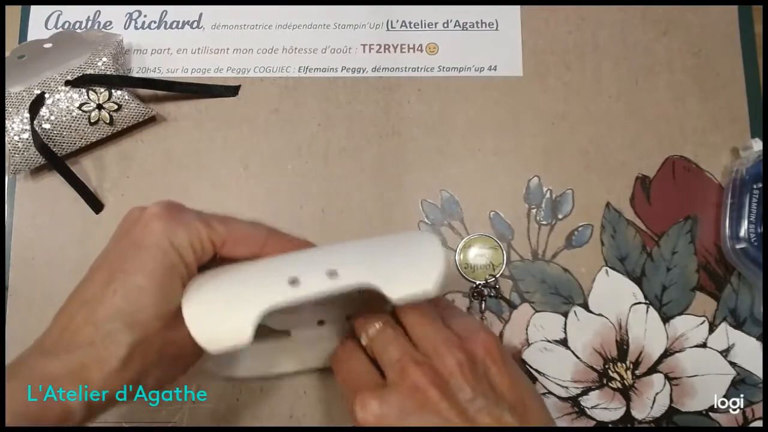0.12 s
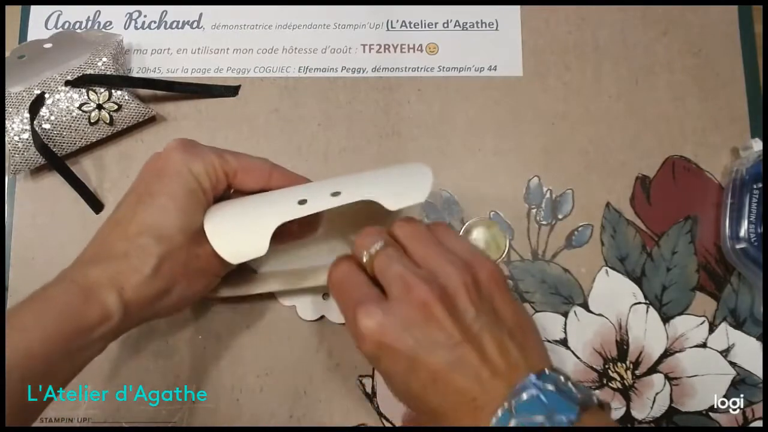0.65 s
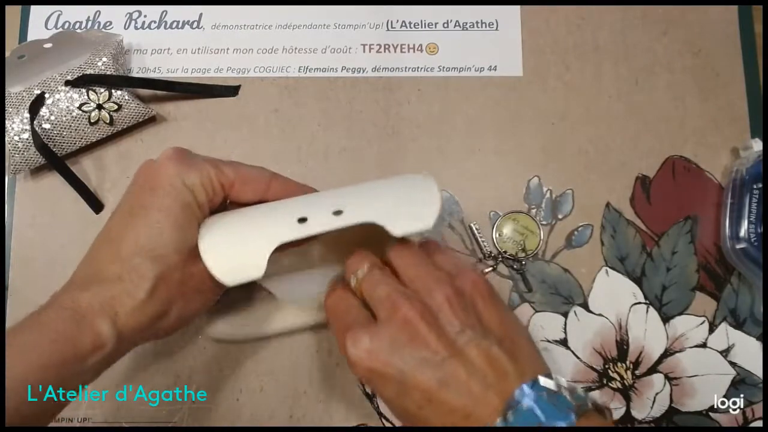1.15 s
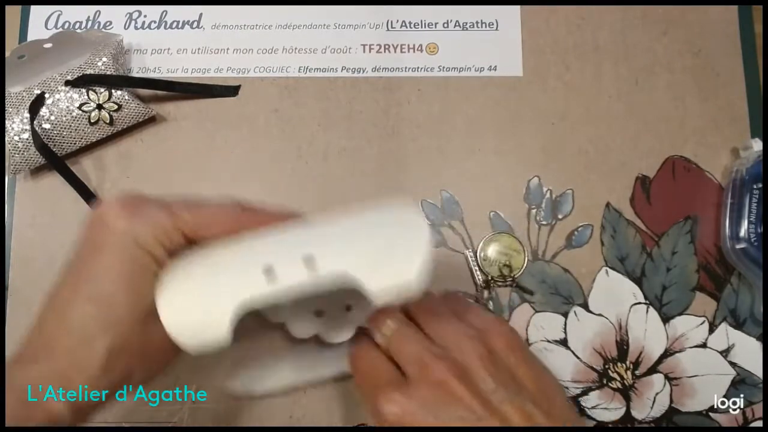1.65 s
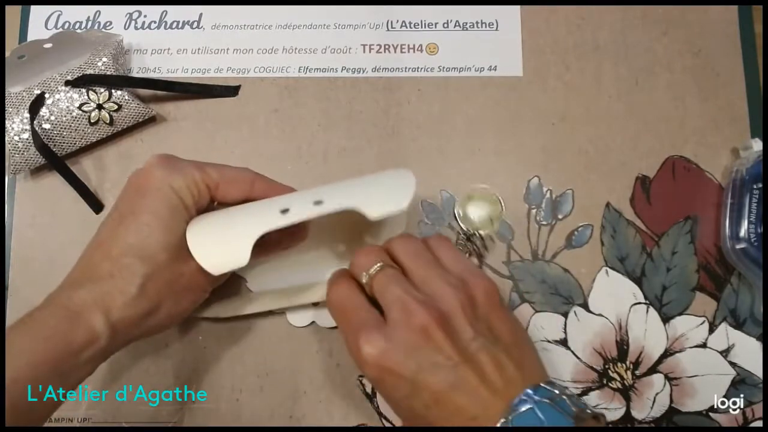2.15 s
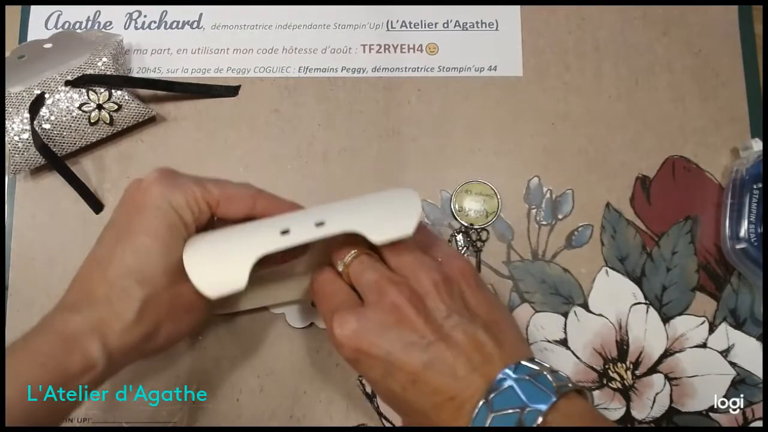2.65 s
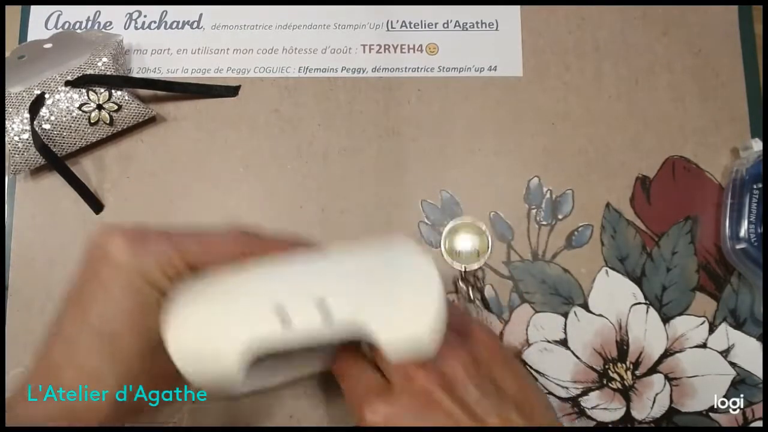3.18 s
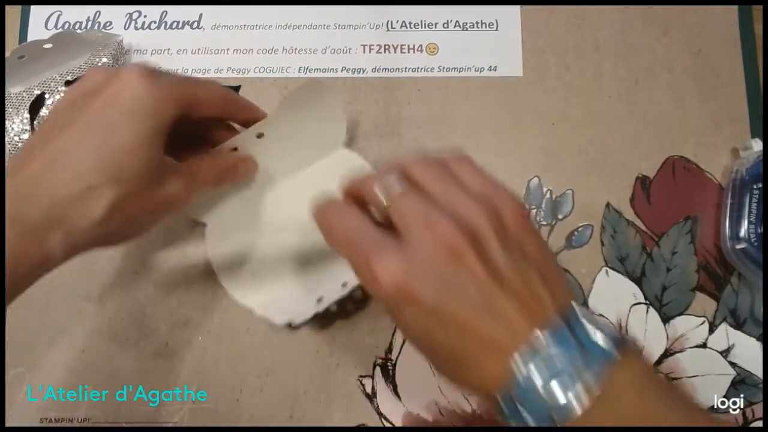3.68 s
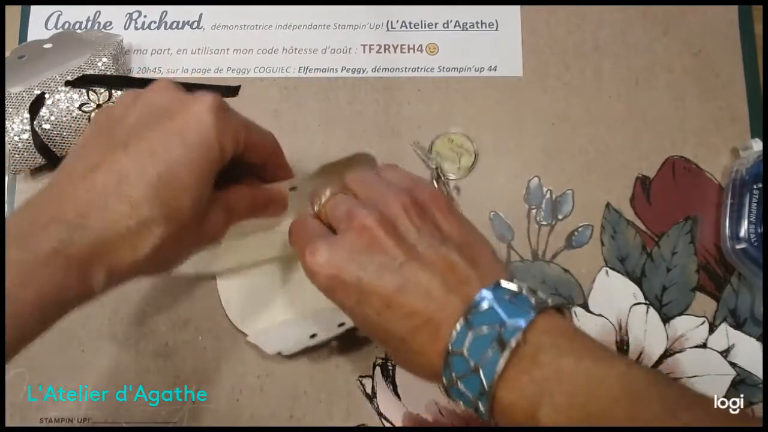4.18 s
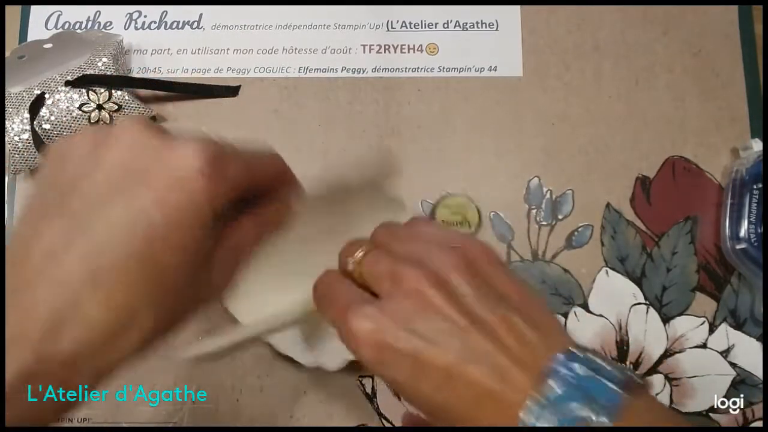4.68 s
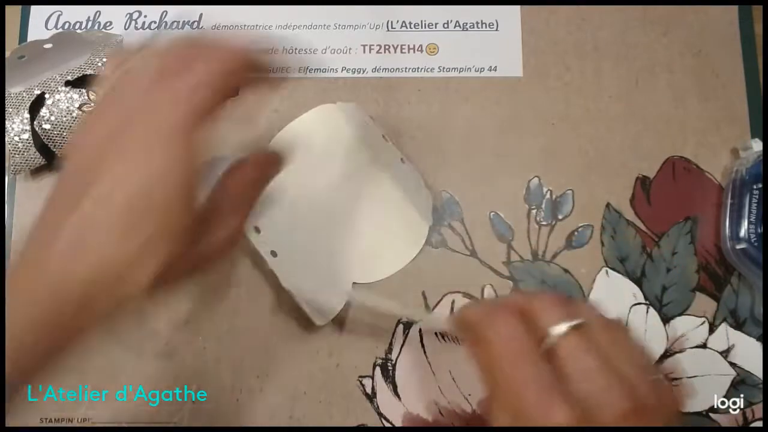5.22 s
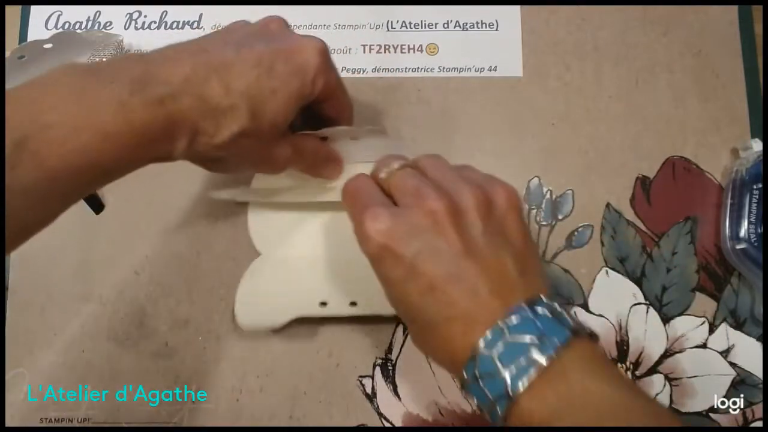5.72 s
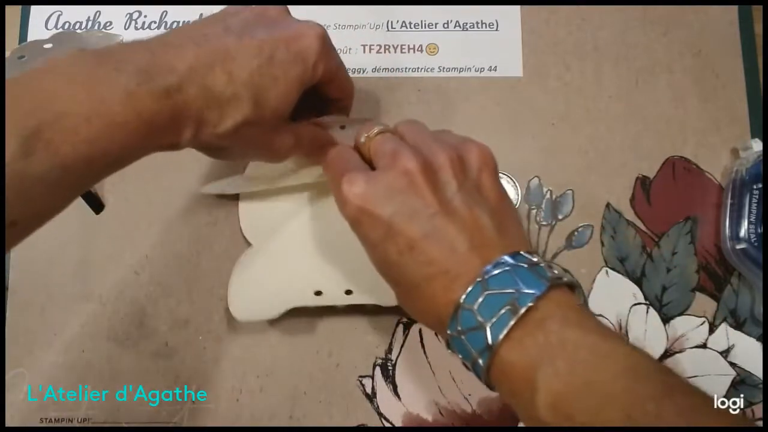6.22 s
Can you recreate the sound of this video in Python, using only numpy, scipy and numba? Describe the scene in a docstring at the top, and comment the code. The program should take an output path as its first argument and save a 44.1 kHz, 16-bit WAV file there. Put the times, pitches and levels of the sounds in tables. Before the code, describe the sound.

Close handling of thick paper: sharp tool knocks on a tabletop, brief rubbing strokes, crisp card snaps, in a quiet small room.

```python
"""Card drawn under a folding tool.

A card cut-out is drawn under a flat folding tool on a craft table, close below two microphone ports.
Sliding is noise from catching fibres, and knocks, flicks and thuds are short blows, all heard through
the resonances of tool, card and board; an air pocket under the card hums through a gliding resonance.
The table top rings on, a small room answers with echoes and a tail, over faint mains hum and air."""
import sys
import numpy as np
from scipy import signal
from scipy.fft import rfft, irfft, next_fast_len
from scipy.io import wavfile
from scipy.ndimage import uniform_filter1d
from numba import njit

SR = 44100
rng = np.random.default_rng(int(sys.argv[2]) if len(sys.argv) > 2 else 0)


def wav_record(signal):
    """Record a signal, one row per channel, as 16-bit PCM in the file named by sys.argv[1]."""
    frames = np.transpose(np.atleast_2d(signal))
    bounded = np.clip(frames, -1, 1)
    # unit amplitude maps onto the largest positive 16-bit level
    quanta = np.round(bounded * 32767).astype(np.int16)
    wavfile.write(sys.argv[1], SR, quanta)


def linear_from_db(decibels):
    """Turn decibels (scalar or array-like) into linear amplitude factors; 0 gives 1."""
    return 10 ** (np.asarray(decibels, float) / 20)


N = 280035  # length [samples]
HZ = np.fft.rfftfreq(next_fast_len(N // 2 + 2048) * 2, 1 / SR)  # frequency grid for whole-signal filters

# Room air spectrum: (frequency [Hz], relative density [dB per Hz])
AIR_SPECTRUM = [(15, -30.5), (25, -4), (54, 5.5), (71, -12), (106, -4), (131, -18), (202, -13), (250, -19),
                (354, -20.5), (729, -26), (856, -19.5), (1580, -29), (15000, -54.5)]
# Mains hum partials: (frequency [Hz], mean level [dB rms])
MAINS_HUM = [(48.4, -78), (102.3, -87.5), (199.2, -95)]

# Resonances of the flat tool, card face, card edge and board:
# (frequency [Hz], nominal width [Hz], relative level [dB])
TOOL_MODES = [(909, 280, -4), (1114, 190, 5), (1267, 180, 4), (1493, 540, -11.5)]
CARD_MODES = [(1733, 290, -2.5), (2154, 320, -4.5), (2700, 480, 2), (3377, 500, 1), (3990, 1300, -6)]
EDGE_MODES = [(4980, 670, 1.5), (5940, 1700, -6), (6940, 1100, 1.5), (7490, 650, -0.5), (8560, 1900, -12.5),
              (10950, 700, -12.5), (13700, 4700, -19.5)]
BOARD_MODES = [(133.2, 72, -8.5), (171, 82, -9), (300.7, 100.5, -1), (458, 110, 3), (510.6, 125, 0.5),
               (718, 130, -4.5)]
# Table-top modes that ring on after contact: (frequency [Hz], relative level [dB], uncapped T60 [s])
TABLE_MODES = [(168, -14.5, 0.37), (284, -10.5, 0.073), (309, -11, 0.9), (310, -14.5, 0.69),
               (455, -6.5, 0.092), (467.8, -2, 0.26), (545, -2.5, 0.36), (594.3, -14.5, 0.75),
               (640, -1, 0.27), (726, -8.5, 0.19), (804, -11, 0.34), (815, -4.5, 0.41), (848, -14.5, 0.1),
               (903, -3, 0.59), (968, -5.5, 0.51), (1028, -5.5, 0.55), (1067, -8.5, 0.31),
               (1118, -4.5, 0.23), (1134, -5.5, 0.28), (1205, -13.5, 0.053), (1296, -11.5, 0.21),
               (1455, -18, 0.78), (1420, -18, 0.18), (1957, -9, 0.15)]

# Card sliding: (fastest at [s], build-up [s], run-out [s], card face level [dB], edge hiss level [dB])
CARD_SLIDES = [(0.15, 0.36, 0.095, -63, -69), (0.42, 0.26, 0.57, -86, -78.5),
               (0.579, .04, 0.052, -75.5, -65), (0.662, 0.017, 0.045, -38.5, -49),
               (0.72, .04, .5, -72.5, -82.5), (1.175, 0.11, 0.038, -46, -57),
               (1.39, 0.066, .09, -58.5, -62), (1.575, 0.0067, .2, -41, -54), (1.64, 0.042, 0.15, -65, -71),
               (1.78, 0.16, 0.11, -67.5, -67), (1.86, 0.14, 0.098, -72.5, -57.5),
               (1.96, 0.087, .05, -67, -56.5), (2.26, 0.084, 0.094, -69.5, -78.5),
               (2.89, 0.17, 0.023, -42, -49), (3.0, 0.3, 0.17, -73, -77), (3.151, 0.12, 0.25, -46.5, -51.5),
               (3.362, 0.071, 0.048, -52, -48.5), (3.42, 0.0557, 0.14, -69.5, -62.5),
               (3.56, 0.09, .1, -59, -67.5), (3.66, 0.086, 0.54, -58.5, -56),
               (3.851, 0.082, 0.22, -62, -63.5), (3.98, 0.034, 0.11, -68.5, -73),
               (4.24, .13, 0.12, -46, -55), (4.4, 0.75, 0.28, -62, -65.5),
               (4.602, 0.17, 0.071, -46.5, -51.5), (4.66, 0.038, 0.024, -70.5, -48),
               (4.72, 0.016, 0.058, -31.5, -46), (4.745, 0.057, 0.016, -35.5, -54),
               (4.82, 0.18, 0.062, -46.5, -54), (4.91, .07, 0.11, -56, -51.5),
               (5.07, 0.074, 0.078, -82.5, -66.5), (5.19, 0.055, 0.21, -55.5, -53),
               (5.31, 0.0602, 0.047, -76, -60.5), (5.4, 0.051, 0.21, -43, -43),
               (5.511, 0.054, 0.044, -55, -60), (5.57, .04, 0.0623, -65, -58.5),
               (5.67, 0.17, 0.1, -59.5, -72), (5.74, 0.083, 0.14, -50, -57.5),
               (5.901, 0.15, 0.12, -53, -64), (5.98, .1, .25, -72, -90.5), (6.045, 0.027, .14, -56, -62.5),
               (6.2, .05, 0.17, -61.5, -66.5)]
# Tool dragging and chattering on the table:
# (hardest at [s], build-up [s], run-out [s], tool level [dB], board level [dB])
TOOL_DRAGS = [(0.1, 0.35, 0.19, -70.5, -68.5), (0.4, .3, 0.9, -76.5, -89), (0.579, 0.037, 0.05, -49, -49),
              (0.67, 0.026, 0.15, -41.5, -43.5), (1.0, .2, 0.23, -88.5, -75.5),
              (1.155, 0.081, 0.066, -53, -63), (1.175, 0.04, 0.1, -58.5, -48), (1.42, .1, 0.056, -53, -52),
              (1.63, 0.092, 0.15, -35, -48.5), (1.819, 0.13, 0.065, -62, -63),
              (1.95, 0.053, 0.21, -45.5, -61), (2.09, 0.024, 0.097, -52, -52), (2.26, .07, 0.086, -77, -84),
              (2.82, .09, 0.094, -55.5, -60), (2.89, 0.071, 0.15, -53, -41),
              (3.151, 0.12, 0.15, -45.5, -41), (3.22, .05, 0.36, -43, -56.5),
              (3.35, 0.035, 0.075, -55, -53.5), (3.56, 0.15, 0.09, -68, -93), (3.66, 0.12, 0.51, -61, -71),
              (3.9, 0.097, .15, -43.5, -37.5), (4.08, 0.12, 0.14, -89, -63), (4.24, 0.13, 0.28, -55.5, -58),
              (4.46, 0.16, 0.075, -69.5, -70.5), (4.602, 0.071, 0.069, -50.5, -46),
              (4.722, 0.024, .05, -41.5, -49.5), (4.81, .06, .04, -78, -70), (4.89, .05, 0.074, -88, -74),
              (5.2, 0.081, 0.12, -44.5, -51.5), (5.42, 0.3, .15, -58, -61), (5.65, 0.095, 0.12, -54, -59),
              (5.74, .05, .07, -69, -68), (5.901, 0.057, 0.084, -69, -74), (6.07, 0.11, 0.096, -69.5, -72)]
# Grip, which sets the free flap of card: (held from [s], flap pitch [Hz])
GRIP_MOVES = [(0, 3230), (0.199, 2700), (0.78, 2126), (1.05, 3144), (1.22, 2243), (1.28, 3306), (1.5, 2885),
              (1.66, 2044), (1.801, 2950), (2.15, 3873), (2.748, 3356), (2.95, 2780), (3.082, 3160),
              (3.28, 3660), (3.43, 2243), (3.76, 3747), (3.9, 2700), (4.21, 3350), (4.281, 2846),
              (4.568, 3600), (4.678, 2120), (4.87, 2588), (5.002, 3324), (5.94, 2630)]

# Room decay: (frequency [Hz], T60 [s])
ROOM_DECAY = [(100, 0.26), (400, 0.06), (1100, 0.18), (2000, 0.15), (5000, 0.21), (12000, .2)]
# Room tail: (frequency [Hz], nominal level against the direct sound [dB])
ROOM_LEVEL = [(100, 1), (400, 1), (1100, -6.5), (2000, -5.5), (5000, -11.5), (12000, -5)]
# Reflections from nearby shelf, wall and ceiling: (delay [s], level [dB])
REFLECTIONS = [(.0045, -14), (.024, -16.5), (.041, -22.5)]

# Tool knocking on the table through the card:
# (time [s], tool peak [dB], board level [dB], card snap level [dB], edge tick level [dB])
TOOL_KNOCKS = [(0.101, -47.5, -45, -69, -53), (0.231, -53, -54, -50.5, -74),
               (0.564, -53.5, -48, -57.5, -59), (0.665, -21, -39, -29.5, -36),
               (0.673, -47.5, -32.5, -18.5, -21.5), (1.175, -55, -33.5, -53, -64),
               (1.189, -41.5, -49, -39.5, -57), (1.424, -36.5, -38, -50.5, -53),
               (1.569, -7.5, -22, -13, -27.5), (1.593, -20.5, -29.5, -32, -40.5),
               (1.801, -47, -49, -49.5, -51), (1.935, -28.5, -39.5, -59, -44),
               (1.995, -42.5, -72, -75, -53), (2.08, -26.5, -40, -32.5, -37.5),
               (2.891, -30, -22.5, -36.5, -44), (2.905, -33.5, -34.5, -31, -47.5),
               (3.143, -38.5, -28, -37.5, -44.5), (3.162, -9, -23.5, -14, -27.5),
               (3.171, -22, -32, -39.5, -44), (3.196, -22, -57, -22.5, -39.5),
               (3.332, -33.5, -47.5, -29.5, -40), (3.35, -40, -41, -58, -51.5),
               (3.643, -47, -63, -46, -47.5), (3.829, -24.5, -53.5, -50, -41.5),
               (3.861, -17, -24, -28.5, -35.5), (3.879, -21, -23, -28, -33.5),
               (4.057, -55, -47.5, -58, -67.5), (4.113, -72.5, -55, -72, -67),
               (4.795, -54.5, -53, -30.5, -28), (5.157, -12, -30, -27, -40.5),
               (5.193, -30, -42, -32.5, -28.5), (5.227, -18, -57, -23.5, -38.5),
               (5.302, -38, -61, -47, -33.5), (5.357, -42, -69, -67, -48.5), (5.65, -38, -50, -39.5, -57.5),
               (5.711, -61, -44, -42, -58)]
# Card alone flicking: (time [s], snap level [dB], edge tick level [dB], left minus right [dB])
CARD_FLICKS = [(0.37, -76, -52, -2), (1.829, -55, -40.5, -0.5), (1.917, -59, -40.5, -6.5),
               (2.068, -31.5, -56.5, 7), (3.259, -35, -45, 6.5), (3.429, -51, -39, 1),
               (3.477, -33.5, -38.5, 6), (3.536, -52, -64, -3), (4.155, -64, -43.5, 6.5),
               (4.747, -25.5, -35, 4.5), (4.81, -34, -36, 13.5), (4.862, -29.5, -22, 9.5),
               (4.881, -47, -51.5, -26), (5.058, -60.5, -43.5, -3), (5.101, -59.5, -43.5, 5.5),
               (5.377, -35, -46.5, 2.5), (5.49, -41.5, -37, 3), (5.516, -33.5, -45, 2),
               (5.558, -41, -35, -2.5), (5.637, -31.5, -44, 4), (5.75, -43.5, -44, 11),
               (5.789, -54, -53.5, 10), (6.264, -52, -81, 7.5)]
# Friction hum of the air pocket under the curled card: (time [s], pitch [Hz], level [dB])
POCKET_GLIDE = [(0.76, 2200, -100), (0.84, 2200, -79.5), (1.03, 2170, -80), (1.07, 2190, -100),
                (3.16, 700, -100), (3.175, 700, -36.5), (3.22, 680, -43.5), (3.29, 700, -54.5),
                (3.33, 700, -100), (4.12, 1230, -100), (4.16, 1236, -76), (4.245, 1060, -47.5),
                (4.3, 1160, -59.5), (4.41, 1100, -61), (4.47, 1075, -73), (4.52, 1020, -54),
                (4.6, 920, -59.5), (4.62, 930, -89), (4.704, 930, -89.5), (4.716, 930, -43),
                (4.74, 960, -41), (4.77, 950, -98.5), (5.15, 700, -100), (5.165, 700, -41),
                (5.261, 700, -54.5), (5.33, 700, -100)]
# Heels of the hands on the table: (time [s], peak level [dB])
HAND_THUDS = [(1.403, -41.5), (1.438, -37), (1.477, -47.5), (1.581, -39), (1.648, -59.5), (2.977, -46.5),
              (3.155, -34.5), (3.9, -40), (3.959, -52), (4.617, -46), (5.181, -48.5), (5.561, -59)]

# Phase offset between the ports: (frequency [Hz], left ahead of right [rad])
PORT_PHASE = [(100, 0.098), (400, 0.36), (1100, 0.37), (3000, 0.38), (8000, 1), (14000, .1)]

EDGE_APART = 1.1  # edge noise private to each port, against the shared part


def unit(x):
    """Normalization: scales to an rms of 1."""
    return x / np.sqrt(np.mean(x ** 2))


def along(points, hz):
    """Logarithmic interpolation: reads (Hz, value) points on a log-frequency axis."""
    f, value = np.transpose(points)
    return np.interp(np.log(hz + 1), np.log(f), value)


def shape(x, gain):
    """Linear filtering: multiplies the spectrum by a complex gain given at HZ."""
    size = 2 * len(HZ) - 2
    return irfft(rfft(x, size) * gain, size)[..., :N]


def flicker(rate):
    """Sample-and-hold noise: random levels held 1 / rate s and slewed, with a spread near 0.8."""
    hold = int(SR / rate)
    held = np.repeat(rng.standard_normal(N // hold + 1), hold)
    return uniform_filter1d(held, hold)[:N]


def air():
    """Broadband noise and periodic hum: steady air, most alike at both ports in the bass, and wavering hum."""
    side_share = np.clip(0.44 + HZ / 4000, 0, 1)
    gain = linear_from_db(along(AIR_SPECTRUM, HZ)) * [HZ ** 0, side_share]
    mid, side = shape(rng.standard_normal((2, N)), gain)
    hiss = unit(np.array([mid + side, mid - side])) * linear_from_db(-68)
    t = np.arange(N) / SR
    hum = 0
    for hz, db in MAINS_HUM:
        hum = hum + linear_from_db(db + 1.5 * flicker(6)) * np.sqrt(2) * np.sin(2 * np.pi * hz * t)
    return hiss + hum


def strokes(rows):
    """Friction loudness follows speed, which climbs and falls evenly; one gain curve per level column."""
    speed_power = 2.57  # amplitude grows as this power of the speed
    t = np.arange(N) / SR
    power = np.full((2, N), 1e-12)
    for s, rise_s, fall_s, *db in rows:
        a, b = int(max(s - rise_s, 0) * SR), int((s + fall_s) * SR)
        speed = np.interp(t[a:b], [s - rise_s, s, s + fall_s], [0, 1, 0])
        power[:, a:b] += (linear_from_db(db)[:, None] * speed ** speed_power) ** 2
    return np.sqrt(power)


def fibres(rate, spread_db, judder_db, apart):
    """Stick-slip: paper fibres catch and let go in dense clicks of uneven size while the grip judders."""
    catch = rng.random(N) < rate / SR
    size = linear_from_db(np.minimum(spread_db * rng.exponential(size=N), 20))
    judder = linear_from_db(judder_db * flicker(60))
    shared, own = rng.standard_normal(N), rng.standard_normal((2, N))
    return catch * size * judder * (shared + apart * own)


def response(modes, order=2):
    """Modal superposition: impulse response of parallel resonances, neighbours in opposite phase."""
    # order 2 darkens the skirts, order 1 speaks at once
    f = np.fft.rfftfreq(8192, 1 / SR)
    gain = 0
    for k, (hz, width_hz, db) in enumerate(modes):
        damping = 1j * f * width_hz * 1.603  # widened because order 2 narrows the peak
        gain = gain + (-1) ** k * linear_from_db(db) * (damping / (hz ** 2 - f ** 2 + damping)) ** order
    return irfft(gain)[:6144]


def ring(x, modes, order=2):
    """Forced vibration: convolves each port with the response of a body."""
    return signal.oaconvolve(x, response(modes, order)[None], axes=1)[:, :N]


@njit
def sweep(x, hz, width):
    """Driven resonance: a state-variable band-pass whose centre moves; width in Hz."""
    y, band, low = np.empty(len(x)), 0., 0.
    for i in range(len(x)):
        g, k = np.tan(np.pi * hz[i] / SR), width / hz[i]
        v = (band + g * (x[i] - low)) / (1 + g * (g + k))
        band, low, y[i] = 2 * v - band, low + 2 * g * v, k * v
    return y


def bending(x, lo_hz, hi_hz, width_hz, count):
    """Plate vibration: narrow modes of the card that come and go as it bends."""
    swing_db = 7
    centres = np.linspace(lo_hz, hi_hz, count) * (1 + 0.048 * rng.standard_normal(count))
    total = 0
    for hz in centres:
        b, a = signal.iirpeak(hz, hz / width_hz, SR)
        total = total + linear_from_db(swing_db * flicker(16)) * signal.lfilter(b, a, x)
    return unit(total)


def rubbing():
    """Friction-driven resonance: sliding excites the bodies, and the grip sets the pitch of the free flap."""
    bend_share = 1.1  # plate modes against the broad rasp
    face_gain, edge_gain = strokes(CARD_SLIDES)
    drag_gain, rumble_gain = strokes(TOOL_DRAGS)
    fine = fibres(12000, 1.7, 3.6, apart=0.7)
    coarse = fibres(3000, 2.04, 4.0, apart=0.27)
    card = unit(ring(fine, CARD_MODES))
    rim = unit(ring(fibres(12000, 4.6, 4.1, apart=EDGE_APART), EDGE_MODES))

    # the grip, and with it the pitch, holds between moves of the hand
    grip_s, flap_hz = np.transpose(GRIP_MOVES)
    grip = np.maximum(np.searchsorted(grip_s, np.arange(N) / SR) - 1, 0)
    held_hz = flap_hz[grip]
    flap = unit(np.array([sweep(sweep(port, held_hz, 150.0), held_hz, 150.0) for port in fine]))
    # a light touch damps the flap less
    face_db = 20 * np.log10(face_gain)
    flap = flap * linear_from_db(np.clip(-4 - 0.3 * (face_db + 60), -8, 10))

    face = unit(card + bend_share * bending(card, 1800, 4600, 160, count=8)) + flap
    face = face / np.sqrt(1 + uniform_filter1d(flap ** 2, 4096))  # evens out the level the flap adds
    edge = unit(rim + bend_share * bending(rim, 4900, 7400, 200, count=5))
    tool = unit(ring(coarse, TOOL_MODES))
    board = unit(ring(coarse, BOARD_MODES))
    sliding = face_gain * face + edge_gain * edge + drag_gain * tool + rumble_gain * board
    # the working hand is a little to the left
    return sliding * linear_from_db([[0.6], [-0.6]])


def table_top(x):
    """Free vibration: table modes set off by whatever touches it decay exponentially."""
    longest_t60_s = 0.42
    t = np.arange(int(0.6 * SR)) / SR
    modes = 0
    for k, (hz, db, t60) in enumerate(TABLE_MODES):
        decay = np.exp(-np.log(1000) * t / min(t60, longest_t60_s))
        modes = modes + (-1) ** k * linear_from_db(db) * np.sin(2 * np.pi * hz * t) * decay
    return signal.fftconvolve(x, modes[None] * linear_from_db(-9) / 200, axes=1)[:, :N]


def room(x):
    """Diffuse reverberation: a dense noise tail, each band with its own decay, partly different at each port."""
    t = np.arange(int(0.6 * SR)) / SR
    f = np.fft.rfftfreq(len(t), 1 / SR)
    shared, own = rng.standard_normal(len(t)), rng.standard_normal((2, len(t)))
    tail = 0
    for hz in 60 * 2 ** (np.arange(17) / 2):  # half-octave steps
        apart = np.clip(0.22 + hz / 2000, 0, 1)
        noise = np.sqrt(1 - apart ** 2) * shared + apart * own
        window = np.exp(-(np.log2((f + 1) / hz) / 0.34) ** 2)
        band = irfft(rfft(noise) * window, len(t))
        t60 = along(ROOM_DECAY, hz)
        onset = np.clip((t - 0.002) / 0.00061, 0, 1)
        fade = np.exp(-np.log(1000) * t / t60) * onset
        energy_scale = np.sqrt(2 * np.log(1000) / t60 / SR)  # same energy for any decay time
        tail = tail + band * fade * linear_from_db(along(ROOM_LEVEL, hz)) * energy_scale
    return signal.fftconvolve(x, tail, axes=1)[:, :N]


def echoes(x):
    """Early reflection: dull, delayed copies reach the ports crosswise and a little apart."""
    dull = signal.lfilter([0.35], [1, -0.65], x[::-1])  # ports swapped
    out = np.zeros_like(x)
    for k, (s, db) in enumerate(REFLECTIONS):
        for port in range(2):
            lag = int(s * SR) + 9 * port * (-1) ** k
            out[port, lag:] += linear_from_db(db) * dull[port, :-lag]
    return out


def panned(db, pan_db):
    """Intensity stereo: splits a level difference between the left and right port."""
    return np.array([db + pan_db / 2, db - pan_db / 2])


def strikes(s, db, modes, crumple_s=0., apart=0., order=2):
    """Impulse excitation: scaled blows ring a body; card gives way in a short crumple, not one click."""
    blows = np.zeros((2, N + 1024))
    chance = rng.standard_normal((len(s), 3, 1024))
    decay = np.exp(-np.arange(1024) / (crumple_s * SR + 1e-6))
    grain = (chance[:, :1] + apart * chance[:, 1:]) * decay
    grain = grain / np.sqrt(crumple_s * SR / 2 + 1)
    grain[..., 0] = 1 if crumple_s == 0 else 0.4
    for k, at in enumerate((np.asarray(s) * SR).astype(int)):
        blows[:, at:at + 1024] += linear_from_db(db)[:, k, None] * grain[k]
    # a single click of gain 1 would ring to a peak of 1
    return ring(blows, modes, order) / np.abs(response(modes, order)).max()


def taps():
    """Impact: knocks ring tool, board, card face and edge; a flick of the card barely moves tool and board."""
    knock_pan_db = 2.5  # left minus right
    knock_s, tool_db, board_db, snap_db, tick_db = np.transpose(TOOL_KNOCKS)
    flick_s, flick_db, flick_tick_db, flick_pan_db = np.transpose(CARD_FLICKS)
    s = np.r_[knock_s, flick_s]
    pan_db = np.r_[0 * knock_s + knock_pan_db, flick_pan_db]
    # -18 and -18.5 dB: the share of a snap that reaches tool and board
    tool_levels = panned(np.r_[tool_db, flick_db - 18], pan_db)
    board_levels = panned(np.r_[board_db, flick_db - 18.5], 0)  # alike at both ports
    snap_levels = panned(np.r_[snap_db, flick_db], pan_db)
    tick_levels = panned(np.r_[tick_db, flick_tick_db], pan_db - knock_pan_db)
    tool = strikes(s, tool_levels, TOOL_MODES, order=1)
    board = strikes(s, board_levels, BOARD_MODES, crumple_s=0.0013)
    snap = strikes(s, snap_levels, CARD_MODES, crumple_s=0.0018, apart=0.15)
    tick = strikes(s, tick_levels, EDGE_MODES, crumple_s=0.006, apart=EDGE_APART)
    return tool + board + snap + tick


def pocket():
    """Cavity resonance: friction noise through one narrow, gliding air resonance."""
    s, hz, db = np.transpose(POCKET_GLIDE)
    t = np.arange(N) / SR
    glide_hz = np.interp(t, s, hz)
    hum = sweep(sweep(rng.standard_normal(N), glide_hz, 160.), glide_hz, 160.)
    return unit(hum) * linear_from_db(np.interp(t, s, db, left=-120, right=-120))


def thuds():
    """Lowest-mode excitation: soft heavy contacts sound one low table mode, nearer the left port."""
    s, db = np.transpose(HAND_THUDS)
    return strikes(s, panned(db, 2), [(61, 61, 0)])


def scene():
    """Superposition: hands at work, the table under them, the room behind them."""
    hands = taps() + thuds() + rubbing() + pocket()
    return hands + table_top(hands) + echoes(hands) + room(hands) + air()


def roll_off(x):
    """The treble ends steeply here."""
    return signal.sosfilt(signal.butter(12, 16650, fs=SR, output="sos"), x)


def record(dry):
    """Phase difference: the two ports differ by a small phase offset and lose the deepest bass."""
    lead = along(PORT_PHASE, HZ) / 2
    phase = np.exp(1j * np.array([lead, -lead]))
    bass_cut = (1j * HZ / (1j * HZ + 30)) ** 2  # two high-pass stages at 30 Hz
    mix = shape(dry, phase * bass_cut)
    return roll_off(mix)


dry = scene()
out = record(dry)
wav_record(out)
```